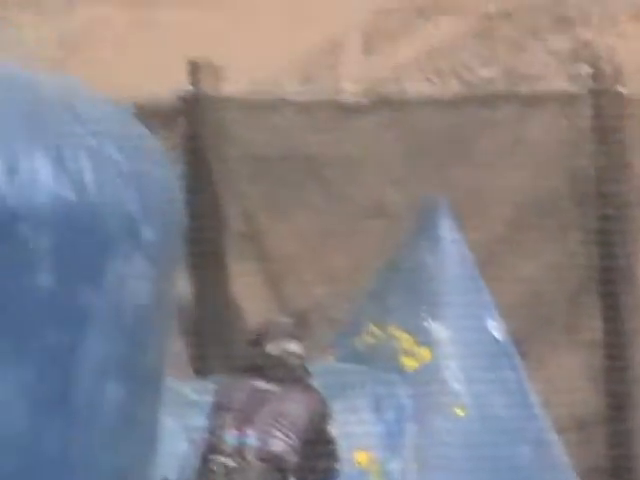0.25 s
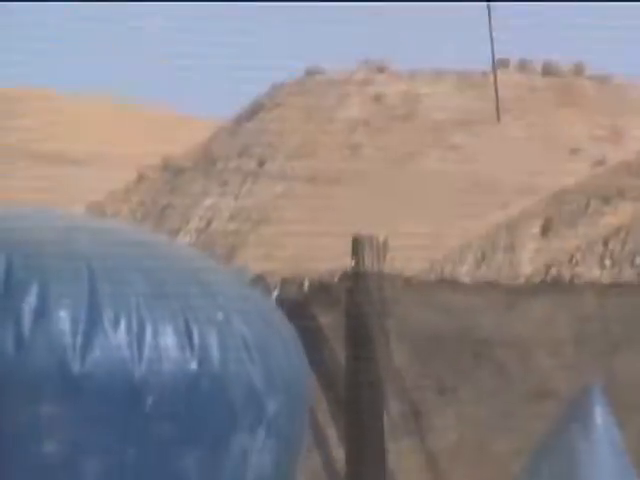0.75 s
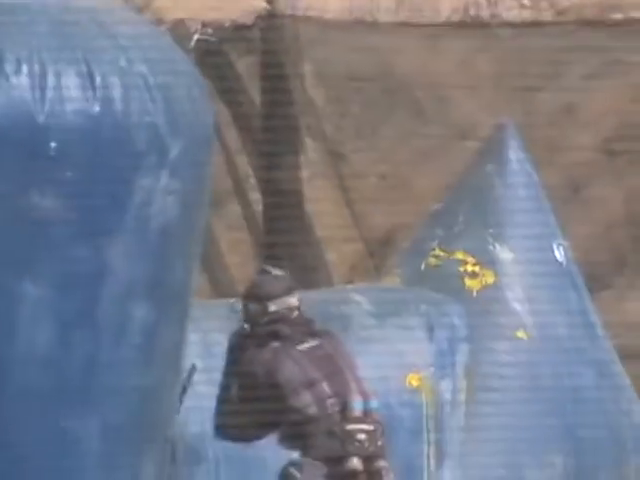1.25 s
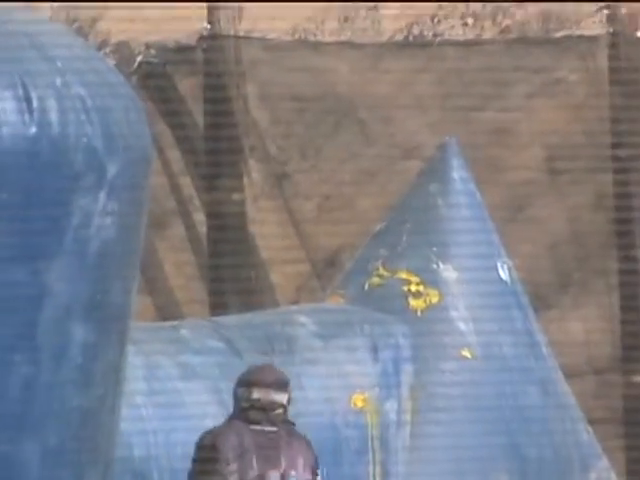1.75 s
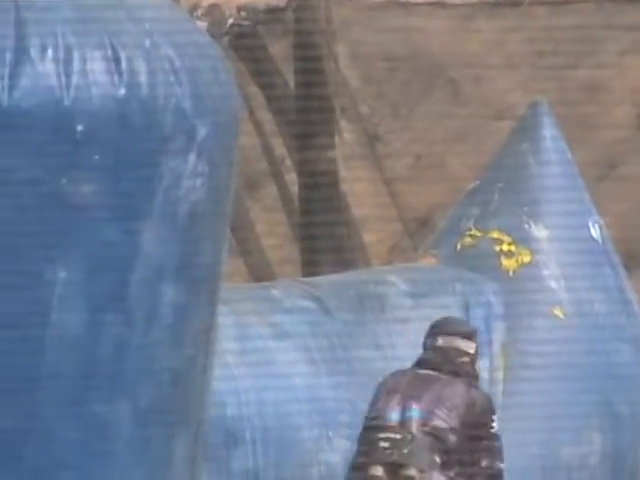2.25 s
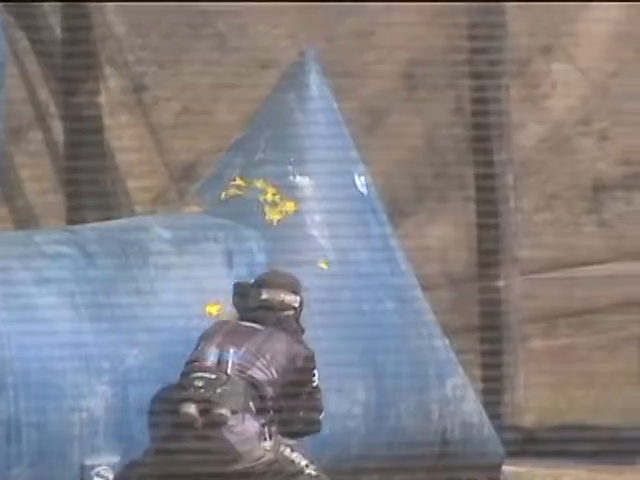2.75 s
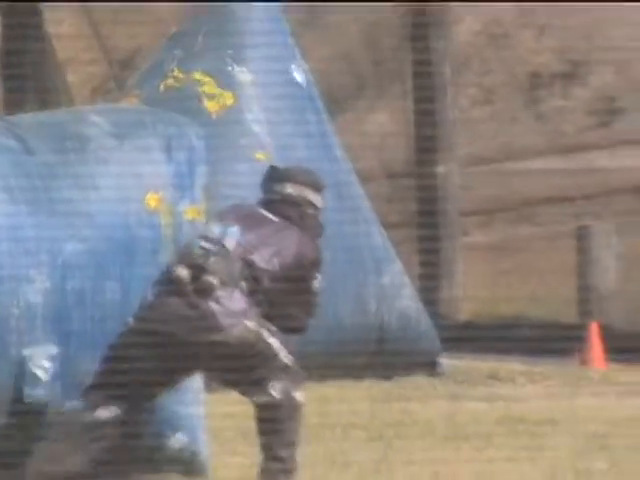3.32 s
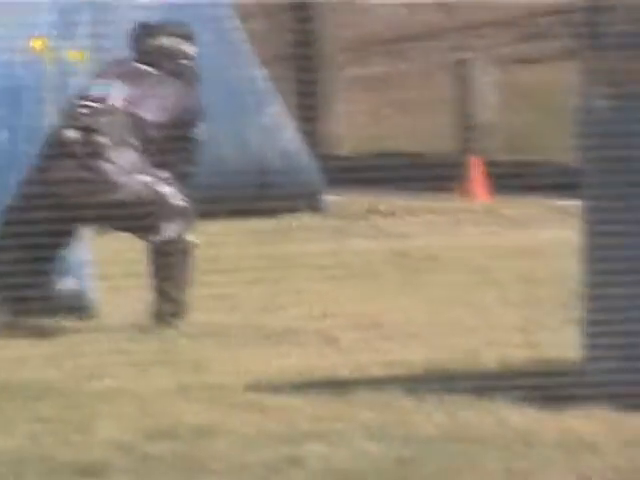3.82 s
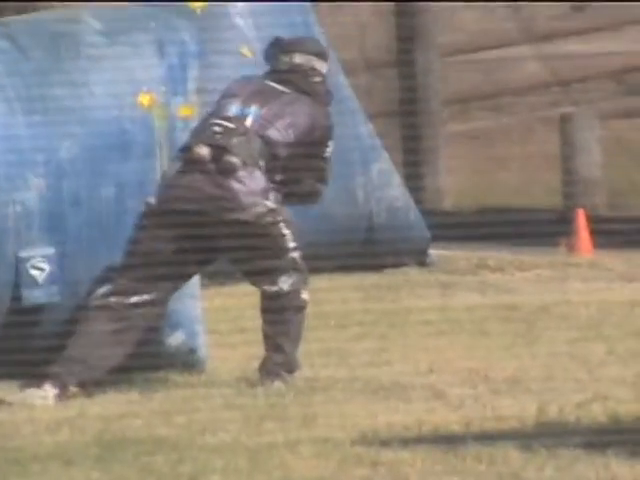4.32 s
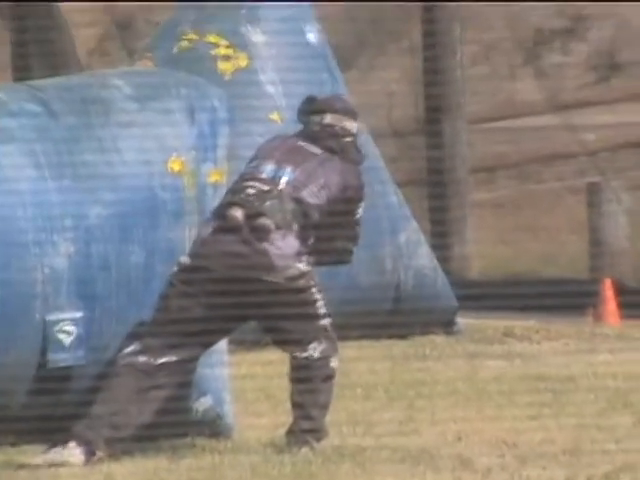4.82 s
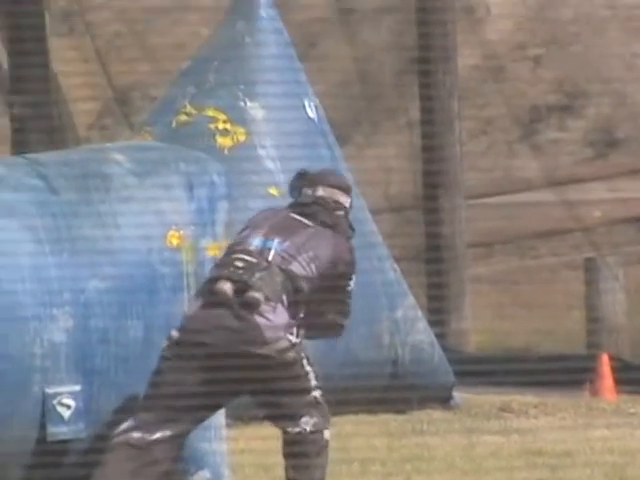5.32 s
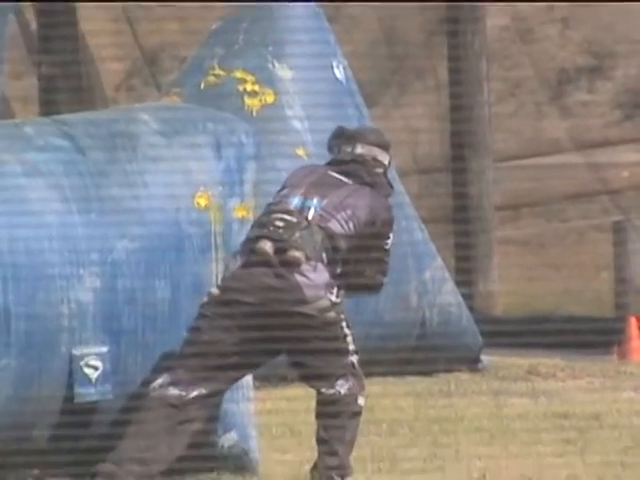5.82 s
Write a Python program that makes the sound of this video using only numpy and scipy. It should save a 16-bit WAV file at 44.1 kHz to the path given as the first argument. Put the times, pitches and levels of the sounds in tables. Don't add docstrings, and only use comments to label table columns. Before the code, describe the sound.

Strings of sharp paintball shots fly back and forth outdoors, splatting wetly and thudding on inflated bunkers, broken by short lulls of soft hiss.

```python
import sys
import numpy as np
from scipy import signal
from scipy.fft import rfft, irfft, next_fast_len
from scipy.io import wavfile

SR = 44100
rng = np.random.default_rng(int(sys.argv[2]) if len(sys.argv) > 2 else 0)


def materialize(psi):
    bounded = np.clip(np.atleast_2d(psi).T, -1, 1)
    quanta = np.round(bounded * 32767).astype(np.int16)
    wavfile.write(sys.argv[1], SR, quanta)


def rack_gain(trim_db):
    fader = np.asarray(trim_db, float)
    return 10 ** (fader / 20)


N = 267687


def band(x, hz, width):
    return signal.lfilter(*signal.iirpeak(min(hz, 0.45 * SR), hz / width, fs=SR), x)


def spectrum_axis(length, hz):
    size = next_fast_len(length, True)
    axis = np.log(np.arange(size // 2 + 1) * SR / size + 1)
    return size, axis, np.log(hz)


def shape(x, points, db_scale=0.5):
    hz, db = np.transpose(points)
    length = x.shape[-1]
    size, axis, log_hz = spectrum_axis(length, hz)
    gain = rack_gain(db_scale * np.interp(axis, log_hz, db))
    return irfft(rfft(x, size) * gain, size)[..., :length]


def delay(x, points):
    hz, turn = np.transpose(points)
    size, axis, log_hz = spectrum_axis(len(x), hz)
    rotation = np.exp(-1j * np.interp(axis, log_hz, turn))
    return irfft(rfft(x, size) * rotation, size)[:len(x)]


def unit(x):
    return x / np.sqrt(np.mean(x ** 2))


def fade(t, rise_s, t60):
    u = np.maximum(t, 0)
    return (1 - np.exp(-u / max(rise_s, 1e-5))) * rack_gain(-60 * u / t60)


def linger(energy, t60):
    keep = rack_gain(-120 / (t60 * SR))
    return signal.lfilter([1 - keep], [1, -keep], energy)


def pair(size):
    # (frequency [Hz], share [0-1])
    likeness = [(100, 0.87), (500, 0.78), (1000, 0.86), (2000, 0.86), (4000, 0.4), (9000, 0), (14000, 0.25)]
    hz, alike = np.transpose(likeness)
    alike = np.clip(alike, 0, 0.999)
    mid, side = rng.standard_normal((2, size))
    side_db = 10 * np.log10((1 - alike) / (1 + alike))
    side = shape(side, np.transpose([hz, side_db]), 1)
    return np.array([mid + side, mid - side])


def n_wave(t, hz):
    u = 2 * np.pi * hz * t + 1
    return u * np.exp(0.5 - u ** 2 / 2)


def puff(t, hz, centre_s, width_s):
    return np.cos(2 * np.pi * hz * (t - centre_s)) * np.exp(-((t - centre_s) / width_s) ** 2 / 2)


def crack(t, noise):
    # (lag [ms], level [dB], pitch of the swing [Hz])
    crack_paths = [
        (-2.8, -9, 1800),
        (-2.1, -14, 1500),
        (0, 0, 2500),
        (.62, -4, 2200),
        (1.95, -10, 1900),
        (3.1, -15, 1500),
        (4.4, -12, 1700),
        (11.5, -27, 5500),
        (22, -31, 5500),
    ]
    paths = 0
    for (ms, db, hz), wobble in zip(crack_paths, noise[2]):
        paths = paths + rack_gain(db + 1.34 * wobble) * n_wave(t - ms / 1000, hz)
    gas = unit(band(band(noise[0], 1560, 4500), 2150, 7200)) * fade(t + 0.0022, 0.0018, 0.021)
    jet = unit(band(band(noise[1], 13000, 6000), 13000, 9000)) * np.exp(-(t / 0.0004) ** 2)
    barrel = puff(t, 240, 0.0036, 0.0022)
    tail_db = -1.5
    return paths + rack_gain(-10.5) * gas + rack_gain(-19) * jet - rack_gain(-16.5) * barrel, tail_db


def boom(t, noise, puff_db, tail_db):
    # (lag [ms], level [dB])
    boom_echoes = [
        (11.2, -15),
        (21.5, -22),
    ]

    def shot(u):
        front = np.exp(-(u / 0.00015) ** 2)
        rebound = 0.31 * np.exp(-((u - 0.0008) / 0.00065) ** 2)
        return front - rebound + rack_gain(puff_db) * puff(u, 238, 0.0039, 0.0024) * (u > 0)

    echoes = sum(rack_gain(db) * shot(t - ms / 1000) for ms, db in boom_echoes)
    gas = unit(band(noise[0], 1300, 4000)) * fade(t, 0.0014, 0.012)
    return shot(t) + echoes + rack_gain(-43) * gas, tail_db


def splat(t, noise, lag_ms, echo_db):
    colour_hz, hold_s, tail_db = 2400, 0.0041, -2.5
    spikes = noise[0] * rack_gain(8.4 * np.abs(noise[1]))
    top = unit(band(band(spikes, 12200, 5100), 12050, 5800))
    spray = unit(unit(band(spikes, colour_hz, 1.4 * colour_hz)) + rack_gain(-15.5) * top)
    burst = fade(t, 0.00032, 0.048) * rack_gain(-60 * np.maximum(t - hold_s, 0) / 0.014)
    bright = unit(band(band(noise[2], 6800, 7800), 4700, 13000))
    late = t - lag_ms / 1000
    echo = np.exp(-(late / 0.0011) ** 2) + 0.2 * np.exp(-((late - 0.008) / 0.00091) ** 2)
    patter = rack_gain(-28) * fade(t, 0.0029, 0.15)
    wet = spray * burst + bright * (rack_gain(echo_db) * echo + patter)
    thump = puff(t, 201, 0.0037, 0.0021)
    return rack_gain(-11.5) * wet + rack_gain(-20) * thump, tail_db


def knock(t, noise, hz, t60, drum_db):
    tail_db = -7
    bounces = np.where(np.abs(noise[0]) > 2.7, noise[0], 0.12 * noise[1])
    hollow = band(band(band(bounces, hz, 1.2 * hz), hz, 1.5 * hz), hz, 2.5 * hz)
    rattle = unit(hollow) * fade(t, 0.001, t60)
    drum = unit(band(band(noise[2], 242, 124), 237, 320)) * fade(t, 0.00098, 0.1)
    blow = 0.6 * n_wave(-t, hz) - np.exp(-((t - 0.0019) * 4 * hz) ** 2)
    slap = unit(band(noise[1], 4000, 4800)) * fade(t - 0.0015, 0.0002, 0.004)
    return blow + rack_gain(-22.5) * slap + rack_gain(-7.5) * rattle + rack_gain(drum_db) * drum, tail_db


def far(t, noise, puff_db):
    tail_db = -3.5
    gas = unit(band(noise[0], 2000, 4500)) * fade(t, 0.00009, 0.02)
    body = unit(band(band(noise[1], 610, 460), 580, 710)) * fade(t, 0.00017, 0.017)
    crack_and_echo = n_wave(-t + 0.0006, 3670) + 0.6 * n_wave(t - 0.0019, 1500)
    barrel = puff(t, 240, 0.0011, 0.0016)
    return crack_and_echo + rack_gain(-11) * gas + rack_gain(-9) * body + rack_gain(puff_db) * barrel, tail_db


def tick(t, noise):
    hz, tail_db = 5100, -8
    spit = unit(band(band(noise[0], hz, hz), hz, 2 * hz)) * fade(t, 0.0005, 0.014)
    return rack_gain(-23.5) * spit, tail_db


def add(track, rows, voice):
    longest, lead_s = 8192, 0.004
    for s, db, *more in rows:
        start = int((s - lead_s) * SR)
        t = (start + np.arange(longest)) / SR - s
        sound, tail_db = voice(t, rng.standard_normal((3, longest)), *more)
        sound = rack_gain(db) * sound[:N - start]
        track[0, start:start + longest] += sound
        track[1, start:start + longest] += rack_gain(tail_db) * sound


def field(send):
    # (frequency [Hz], near level [dB], near t60 [s], hill level [dB], hill t60 [s])
    bands = [(134.3, -2, 0.12, -13, 1.07), (257, -4.5, 0.13, -13.5, 0.76), (521, -2.5, 0.19, -14, 1.1),
             (1000, -2, 0.15, -8, 0.57), (1943, -6.5, 0.36, -8.5, 1.34), (2570, -9.5, 0.083, -11, 0.43),
             (5300, -7.5, 0.12, -11.5, 0.9), (8500, -22, 0.068, -38, 2.5)]
    out, noise = 0, pair(N)
    for hz, near_db, near_t60, hill_db, hill_t60 in bands:
        energy = linger(band(band(send, hz, hz), hz, hz) ** 2, 0.013)
        near = rack_gain(2 * near_db) * linger(energy, near_t60)
        hill = rack_gain(2 * hill_db) * linger(linger(energy, 0.56), hill_t60)
        width = 0.76 * hz
        echoes = unit(band(band(band(noise, hz, hz), hz, width), hz, width))
        out = out + echoes * np.sqrt(near + hill)
    return out


def slope():
    # (time [s], level [dB])
    washes = [(-.15, -36), (1.49, -37), (1.555, -23), (1.925, -33), (2.978, -27), (3.58, -30), (3.70, -49),
              (3.74, -30.5), (3.96, -37.5), (4.995, -38), (5.04, -30)]
    # (frequency [Hz], level [dB])
    wash_colour = [(300, -30), (800, -10), (1300, 0), (2400, 0), (3200, -5), (3800, -24), (6500, -44),
                   (9000, -64)]
    wash_rise_s = (0.005, 0.045)
    wash_t60_s = (0.27, 1)
    # (frequency [Hz], level [dB])
    wash_split = [
        [(1200, 27.5), (2400, 3)],
        [(1000, 11.5), (2000, 2.5)],
    ]
    t, out, wash = np.arange(N) / SR, 0, unit(shape(pair(N), wash_colour))
    for rise_s, t60, split in zip(wash_rise_s, wash_t60_s, wash_split):
        energy = sum((rack_gain(db) * fade(t - s, rise_s, t60)) ** 2 for s, db in washes)
        out = out + shape(wash, split) * np.sqrt(energy)
    return out


def floor():
    # (frequency [Hz], level per Hz [dB])
    air_colour = [(30, -16), (60, 2), (180, 0), (1400, -2.5), (3000, -7), (3900, -14.5), (11000, -25.5),
                  (14300, -48)]
    air = rack_gain(-49) * unit(shape(pair(N), air_colour, 1))
    hiss = pair(N)
    hiss = hiss + 0.35 * np.roll(hiss, 55, axis=1)
    hiss = shape(hiss, [(11400, -23), (11800, 5), (15750, 3), (15900, -60)])
    dip = np.cos(np.pi * (74.921 * np.arange(N) / SR - 0.49)) ** 4
    return air + rack_gain(-55) * unit(rack_gain(-10 * dip) * hiss)


def scene():
    # (time [s], peak level [dB])
    cracks = [(1.1878, -5), (1.2553, -5.5), (1.3428, -6.5), (1.4219, -5), (1.583, -5), (1.706, -5.5),
              (1.771, -7), (1.8339, -5), (1.9949, -5.5), (2.0565, -6), (2.1163, -5), (2.1814, -6),
              (2.2493, -5.5), (2.3316, -4.5), (3.375, -2.5), (3.4344, -4), (3.5111, -3.5), (3.5983, -5.5),
              (3.67, -7.4), (3.7496, -10.5), (4.6551, -4.5), (4.7255, -5), (4.8113, -4), (4.989, -7),
              (5.9688, -7), (6.0315, -5)]
    # (time [s], peak level [dB], barrel puff [dB], tail [dB])
    booms = [(.1061, -2, -13, 1.5), (0.3667, -12.5, -15, 7.5), (.6032, 3, -14.5, -2),
             (1.1834, -1, -8, -1.5), (2.9733, 6, -11, -1), (3.1713, -5, -4.5, -0.5), (3.4728, -6.5, -2, 1),
             (3.5178, -8.5, -6.5, 4), (3.636, -9.5, -3, 4), (3.6932, 4.5, -10, 0), (3.9567, 3.5, -8, -4),
             (4.2789, -4.5, -9, 4.5), (4.5838, 3.5, -9.5, -1), (4.6623, 2, -7, -1), (4.741, 1.5, -8, -4),
             (4.8127, -2, -9, -1.5), (5.0276, 5, -8, -2), (5.1101, 1.5, -7.5, -3)]
    # (time [s], level [dB], net echo lag [ms], net echo level [dB])
    splats = [(0.1327, -10.5, 16.3, -9), (0.379, -9, 18, -10), (1.1714, -6.5, 14.5, -9),
              (1.346, -3.5, 15.7, -16), (2.9675, -3, 16.5, -15), (3.1615, 1.5, 20, -13),
              (3.25, -1.5, 18.7, -8.5), (3.3772, -2, 19.7, -10), (3.4866, -4, 17.4, -7),
              (3.6311, -3, 17.6, -6.5), (3.7335, 1, 16.7, -13), (4.2686, -1, 20.3, -11.5),
              (4.3728, -2.5, 20.4, -11.5), (4.4468, -1.5, 21, -13), (4.522, -0.5, 19.7, -12.5),
              (4.5907, -3, 19.4, -7.5), (4.7013, -4.5, 18.8, -1.5), (4.808, -10.5, 16, -22),
              (4.9, -4, 17.7, -7.5), (6.065, -0.5, 19, -12)]
    # (time [s], level [dB], knock pitch [Hz], t60 [s])
    knocks = [(1.4793, -3.5, 870, 0.18), (1.5353, 1, 760, 0.12), (1.547, -6.5, 960, 0.25),
              (1.563, -10, 1000, 0.23), (1.854, -15, 960, 0.25), (1.9216, -9.5, 1310, 0.093),
              (2.977, -27, 910, 0.18), (3.5744, -10, 1070, 0.089), (3.7372, -0.5, 1460, 0.037),
              (3.8258, -8, 835, 0.13), (4.9928, -10, 800, 0.059), (5.039, -11, 990, 0.15)]
    # (time [s], level [dB], puff [dB])
    far_shots = [(2.063, -10, -19), (2.3075, -14.5, -8), (2.4806, -18.5, -5), (2.5518, -19, -13.5),
                 (2.5911, -18.5, -5), (2.6606, -18, -8.5), (2.7457, -18, -10.5), (2.801, -15.5, -5.5),
                 (5.256, -27, 0), (5.3075, -24.5, -5.5), (5.8673, -32.5, 5.5)]
    # (time [s], level [dB])
    ticks = [(0.186, -12), (0.22, -13), (0.233, -15), (0.435, -9.5), (0.465, -12), (.6704, -22),
             (1.512, -32), (1.5665, -16), (1.5934, -21), (1.854, -2), (2.939, -8), (2.953, -5),
             (3.066, -10), (3.135, -19), (3.3363, -13), (3.3488, -4), (3.464, -4), (3.503, -8),
             (3.9997, -6), (4.213, -8.5), (4.243, -10), (4.2566, -7), (4.356, -6), (4.719, -3),
             (5.108, 0.5), (5.9564, -27)]
    track = np.zeros((2, N))
    add(track, cracks, crack)
    add(track, booms, boom)
    add(track, splats, splat)
    add(track, [(s, db, hz, t60, -13.5 - db) for s, db, hz, t60 in knocks], knock)
    add(track, far_shots, far)
    add(track, ticks, tick)
    direct, send = track
    scatter = np.abs(band(direct, 12000, 5200)) * rng.standard_normal(N)
    side = rack_gain(2.5) * band(scatter, 4400, 7600)
    return direct + np.array([side, -side]) + field(send) + slope() + floor()


def roll_off(x):
    return signal.sosfilt(signal.butter(12, 16660, fs=SR, output="sos"), x)


def record(dry):
    # (frequency [Hz], level [dB])
    balance = [(25, -2), (60, -3.4), (250, -1.2), (600, .2), (1000, -.5), (2000, -1.7), (4000, .6),
               (12000, .3)]
    # (frequency [Hz], phase [rad])
    port_phase = [(20, 0.15), (260, 0.34), (3010, -0.13), (4650, 0.69), (6370, -0.24), (9040, -0.81),
                  (11400, 0.074), (16000, 0.095)]
    left, right = shape(dry[0], balance, 0.5), shape(dry[1], balance, -0.5)
    ports = np.array([left, delay(right, port_phase)])
    ports = shape(ports, [(30, -12), (90, -11), (140, -4)])
    over = np.abs(ports - np.clip(ports, -1, 1))
    ports = ports + rack_gain(28) * linger(linger(over, 0.1), 0.45)
    held = shape(np.clip(ports, -1, 1), [(15000, 0), (15900, -22), (16500, -38), (16700, -120)])
    return roll_off(held)


dry = scene()
out = record(dry)
materialize(out)
```